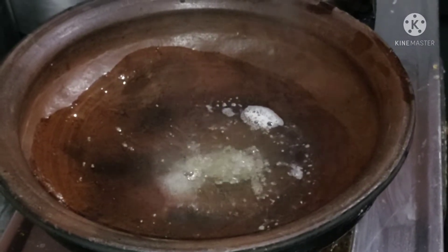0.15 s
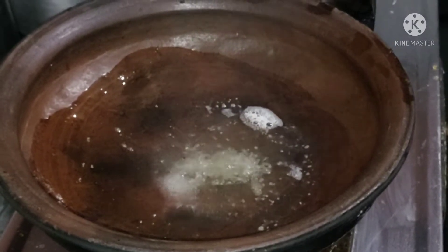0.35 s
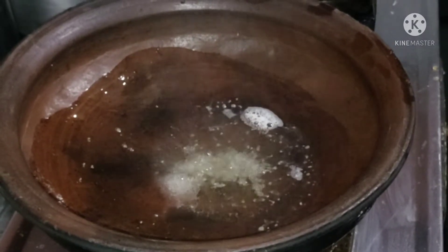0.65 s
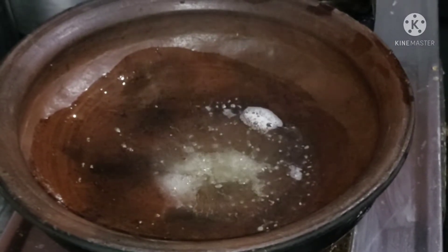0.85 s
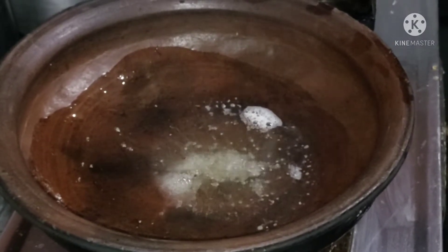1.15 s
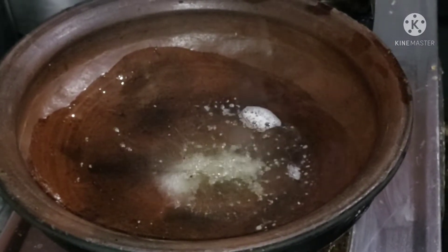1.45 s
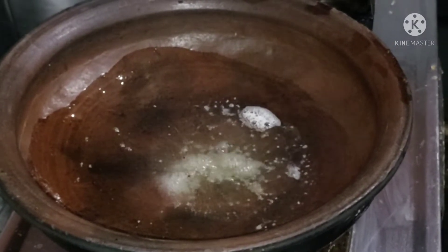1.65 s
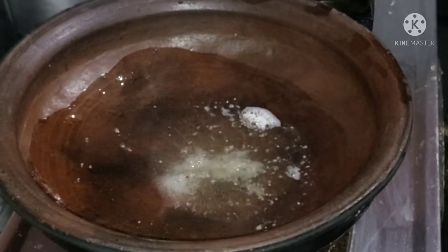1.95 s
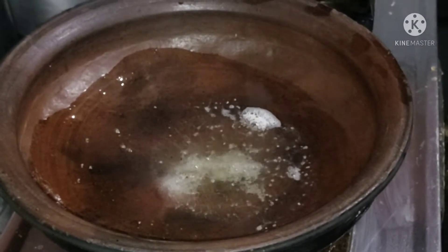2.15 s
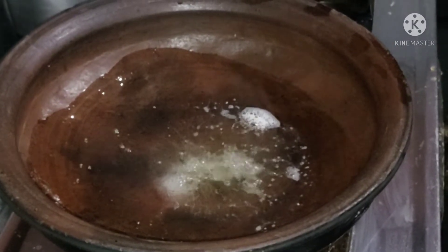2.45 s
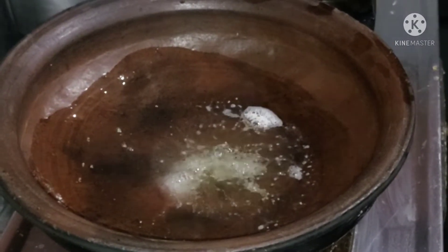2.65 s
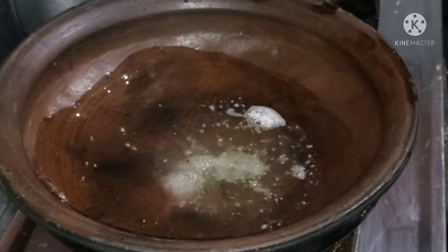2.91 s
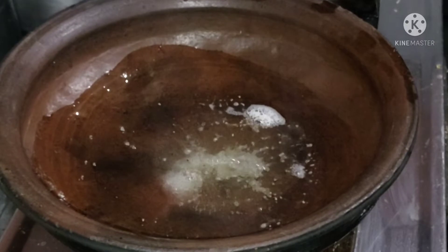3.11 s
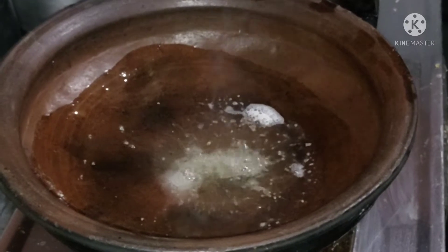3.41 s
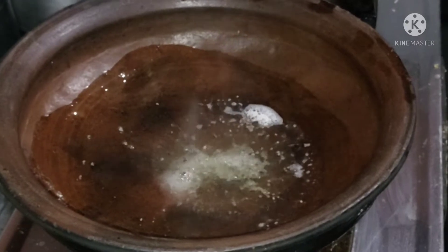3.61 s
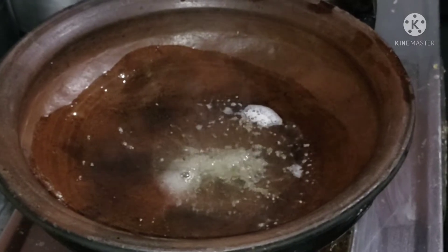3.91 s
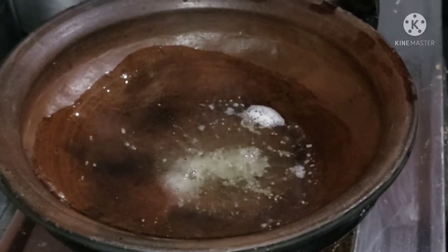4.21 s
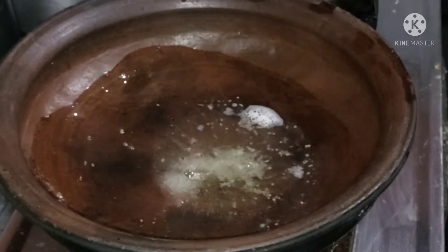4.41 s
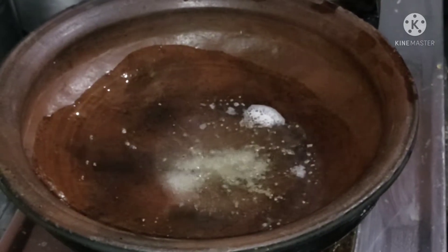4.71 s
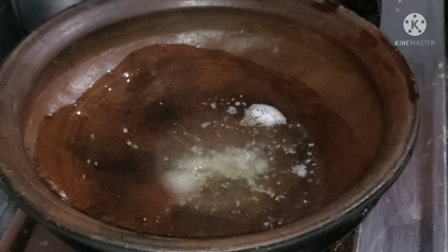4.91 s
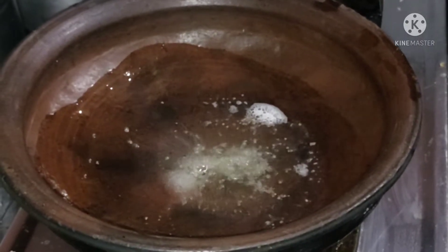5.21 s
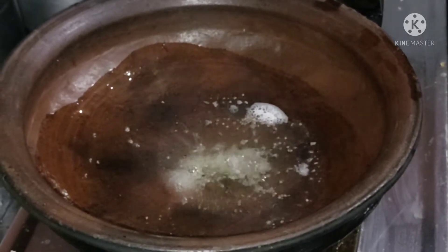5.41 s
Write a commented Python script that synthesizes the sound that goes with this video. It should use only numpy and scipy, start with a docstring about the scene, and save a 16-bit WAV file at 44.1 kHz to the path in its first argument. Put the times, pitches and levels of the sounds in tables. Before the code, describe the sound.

Sharp, hollow pops of bursting seeds in hot oil, bunching into quick flurries, ring briefly in a small hard-walled kitchen.

```python
"""A small, hard-walled kitchen: seeds burst in hot oil in a clay pot on a gas stove, heard close up.
Each burst frees one or two resonant steam bubbles, each with a noisy crack, coloured by the pot and room.
The harder the crack, the brighter it is; twice the oil spits with a sharp hiss, and a few bursts knock the pot.
Underneath lie random sizzle ticks, the burner's filtered-noise rush, a wavering sine hum and soft, far tones."""
import sys
import numpy as np
from scipy import signal
from scipy.fft import rfft, irfft, next_fast_len
from scipy.io import wavfile
from scipy.ndimage import uniform_filter1d, map_coordinates

SR = 44100
rng = np.random.default_rng(int(sys.argv[2]) if len(sys.argv) > 2 else 0)


def wav_out(sig):
    """Save sig, one row per channel (or a flat mono array), as 16-bit PCM at SR to the path in sys.argv[1]."""
    wavfile.write(sys.argv[1], SR, np.round(np.clip(np.atleast_2d(sig).T, -1, 1) * 32767).astype(np.int16))


N = 245195

# soft far tones: (start [s], length [s], pitch [Hz], level [dB])
FAR_TONES = [(-.1, 0.11, 775, -56.5), (-.06, 0.34, 724, -67.5), (-.04, 0.33, 940, -62),
             (.68, 0.21, 353.8, -77), (2.63, 0.079, 390.5, -59.5), (2.68, 0.13, 506, -75)]
# steam bubbles of bursting seeds, before the trim in pops; one burst may free two, a few ms apart:
# (time [s], bubble level [dB], bubble pitch [Hz], crack level at 4 kHz [dB])
SEED_BUBBLES = [(-.03, -4.5, 1620, -39), (.039, -0.5, 1620, -30.5), (0.1639, 10.5, 1513, -23),
                (.242, 3.5, 2100, -14), (.433, 3, 1830, -19.5), (.436, -4.5, 2870, -42),
                (.557, -0.5, 1640, -46), (.7754, -18, 1590, -50), (.842, -6, 1620, -27),
                (1.076, 2, 2240, -17), (1.158, 3.5, 1690, -27), (1.239, -2, 1740, -32),
                (1.298, -4.5, 1570, -35), (1.369, -4.5, 2120, -23), (1.42, 5.5, 1810, -16.5),
                (1.457, 4.5, 1700, -20), (1.628, 5.5, 1720, -19.5), (1.718, 1.5, 1530, -30),
                (1.8247, 3.5, 2525, -21.5), (2.091, -0.5, 1880, -20.5), (2.296, -9, 2050, -23),
                (2.409, -14, 1800, -38), (2.4643, -2.5, 1650, -11.5), (2.5208, 4.5, 2750, -21),
                (2.5499, 10.5, 1680, -23), (2.609, -14.5, 4350, -27), (2.67, 6, 2000, -17),
                (2.783, -9, 1550, -23), (3.0262, -2.5, 1630, -25), (3.2743, 10.5, 1630, -10.5),
                (3.3274, 8.5, 1900, -7.5), (3.369, 10, 1840, -13), (3.44, 8.5, 2310, -15.5),
                (3.4553, 3.5, 2210, -9.5), (3.455, 2.5, 3770, -32), (3.783, -11.5, 3200, -24.5),
                (3.8115, 9, 1520, -18.5), (3.8125, 5, 2560, -18), (4.206, -0.5, 1830, -23),
                (4.512, -0.5, 1840, -19), (4.6183, 3, 1910, -15.5), (4.6202, -7.5, 4270, -49),
                (4.756, -11, 1740, -19.5), (4.859, 0.7, 1660, -25), (4.944, -2.5, 1660, -27),
                (5.036, -0.5, 1800, -29), (5.037, -10.5, 4340, -40), (5.093, -5.5, 6050, -14.5),
                (5.098, 2.5, 1520, -43), (5.1202, 13.5, 1615, -17.5), (5.3204, 6.5, 2600, -18),
                (5.423, 12, 1720, -22), (5.475, 9.5, 1850, -18.5), (5.486, 2.5, 1960, -36)]
# water flashing to steam in the oil, same trim: (time [s], bubble level [dB], bubble pitch [Hz], hiss at 4 kHz [dB])
OIL_SPITS = [(1.212, -17, 1650, -37.5), (1.526, -8.5, 1540, -14)]
# sharpness of a bubble's resonance by its pitch: (pitch [Hz], Q [-])
BUBBLE_SHARPNESS = [(1500, 1.945), (2100, 1.207), (2600, 3.1), (4700, 2.3)]
# colour of the clay bowl: (frequency [Hz], gain [dB])
POT_COLOUR = [(150, -6.5), (400, -6), (750, -13), (1080, -3.5), (1300, 0), (1430, -6), (1590, 2.5),
              (1850, -7.7), (2130, -1), (2420, -12), (2700, 1), (4400, 6), (7000, -4), (15000, -21)]
# delay of each frequency within a burst: (frequency [Hz], delay [s])
BURST_DELAY = [(300, 0.0013), (1500, 0.00186), (3000, 0.00068), (5000, 0.00093), (9000, 0.0001)]
# narrow resonances of pot and stove that stand out in the echoes: (frequency [Hz], gain [dB])
ECHO_RESONANCES = [(947, 4.1), (979, 5.9), (1071, 7.0), (1173, 5.9), (1232, 4.7), (1286, 6.3), (1324, 6.6),
                   (1480, 4.0), (1588, 5.0), (1625, 5.2), (1781, 3.7), (1884, 4.0), (1959, 4.3),
                   (2077, 4.1), (2121, 5.2), (2158, 5.5), (2390, 3.9), (2605, 4.8), (2686, 6.0),
                   (2896, 4.0), (2939, 3.7), (3063, 4.0), (3186, 4.3), (3219, 5.1)]
# first wall reflections: (delay [s], level [dB])
WALL_REFLECTIONS = [(.0105, -4.5), (0.0122, -23.5), (0.0173, -54)]
# time the kitchen's echoes take to fall 60 dB: (frequency [Hz], decay time [s])
KITCHEN_DECAY = [(200, 0.88), (600, 0.59), (1500, 0.43), (3700, 0.34), (9500, 0.28), (15000, 0.34)]
# relative spectrum of the burner's rush: (frequency [Hz], density [dB per Hz])
BURNER_COLOUR = [(15, -32), (25, -0.5), (101, 1), (164, -4), (399, -12), (703, -17.5), (1450, -6),
                 (1570, -11.5), (2420, -13.5), (5280, -16), (6920, -15.5), (15500, -22.5)]
# the hum's level before its trim and wavering: (time [s], level [dB])
HUM_CONTOUR = [(0.0, -85), (0.15, -88), (0.26, -65.5), (0.4, -76.5), (1.98, -79), (2.2, -72), (2.26, -86),
               (4.91, -75.5), (5.39, -93), (5.56, -78)]
# dull knocks of the pot under a few bursts: (time [s], level [dB])
POT_KNOCKS = [(1.158, -18.5), (1.526, -18.5), (3.812, -17)]
# treble and bass balance of the two ports: (frequency [Hz], left minus right [dB])
PORT_BALANCE = [(100, 1.5), (400, 0.5), (1300, 0), (2400, -2.5), (4400, -4), (6500, -5.5), (8500, 6),
                (15000, 11)]

HZ = np.fft.rfftfreq(4096, 1 / SR)  # frequency grid for short impulses
TOP_HZ = 15550  # band limit
TOCK_HZ, TOCK_Q, TOCK_DB = 1590, 8, 8  # air resonance of the bowl
BUBBLE_REACH = 2.85  # a bubble starts softly: little sound above this multiple of its pitch
TYPICAL_CRACK_DB, CRACK_TILT_DB = -22, -0.46  # a typical crack and its slope [dB per octave]
BRIGHTEN = 0.18  # slope gained [dB per octave] for each dB of a harder crack
SPIT_TILT_DB = 14.5  # slope of a spit's hiss [dB per octave]
BURNER_MID_DB = -71.5  # rms of what both sides of the rush share
HUM_HZ, HUM_TRIM_DB, HUM_SWING_DB, HUM_KNOTS_PER_S = 93.3, -0.5, 3, 7
KNOCK_HZ, KNOCK_Q = 464, 0.87


def amp(db):
    """Decibels to gain."""
    return 10 ** (np.asarray(db) / 20)


def unit(x):
    """Scale a signal to rms 1."""
    return x / np.sqrt(np.mean(x ** 2) + 1e-20)


def along(points, hz):
    """Read a (frequency [Hz], value) curve on a log frequency axis."""
    f, v = np.transpose(points)
    return np.interp(np.log(hz + 1), np.log(f + 1), v)


def wobble(rate):
    """A smooth random curve with this many knots a second."""
    knots = rng.standard_normal(int(N * rate / SR) + 4)
    return map_coordinates(knots, [np.arange(N) * rate / SR])


def filtered(x, response):
    """Shape a sound with a gain that depends on frequency."""
    n = x.shape[-1]
    m = next_fast_len(n + 8192)
    spectrum = rfft(x, m) * response(np.fft.rfftfreq(m, 1 / SR))
    return irfft(spectrum, m)[..., :n]


def impulse(gain):
    """The minimum-phase impulse with these gains on the HZ grid: energy comes as early as it can."""
    cepstrum = irfft(np.log(np.maximum(gain, 1e-6)))
    half = len(cepstrum) // 2
    cepstrum[1:half] *= 2
    cepstrum[half + 1:] = 0
    return irfft(np.exp(rfft(cepstrum)))


def bell(hz, q):
    """A resonance peak of height 1 on the HZ grid."""
    return 1 / (1 + q ** 2 * ((HZ + 1) / hz - hz / (HZ + 1)) ** 2)


def add(track, s, sound):
    """Mix a sound into a track at time s."""
    start = round(s * SR)
    part = sound[..., max(-start, 0):max(N - start, 0)]
    track[..., max(start, 0):max(start, 0) + part.shape[-1]] += part


def echo_noise(alike, grain_db=2):
    """Dense, lumpy stereo echoes: more alike in the bass, with peaks at the pot and stove resonances."""
    noise = rng.standard_normal((2, SR * 3 // 5))
    lumps = unit(uniform_filter1d(rng.standard_normal(noise.shape[1]), size=90))
    noise = unit(noise * amp(grain_db * lumps))

    def colour(hz):
        width_hz = 10
        peaks = sum((amp(db) - 1) * np.exp(-((hz - f) / width_hz) ** 2) for f, db in ECHO_RESONANCES)
        tint_db = along([(800, 8.5), (1000, 8), (1600, 7.0), (2120, 9.0), (2450, 14),
                         (2690, 6), (3000, 1), (3500, 0)], hz)
        likeness = along([(300, 0.8), (900, alike), (3000, 0)], hz)
        turn = np.arccos(np.clip(likeness, 0, 1)) / 2  # shares power between mid and side
        return amp(tint_db) * (1 + peaks) * np.array([np.cos(turn), np.sin(turn)])

    mid, side = filtered(noise, colour)
    return np.array([mid + side, mid - side])


def room(echoes, direct):
    """Path to the two ports: direct sound, first walls, then echoes that mostly die faster in the treble."""
    hz, t, z = signal.stft(echoes, SR, nperseg=256)
    t60 = along(KITCHEN_DECAY, hz)[:, None]
    even_energy = np.sqrt(2 * np.log(1000) / (t60 * SR))  # a long decay starts lower
    decay = amp(-60 * t / t60) * even_energy
    path = signal.istft(z * decay, SR, nperseg=256)[1]
    build_s = .004  # echoes take a few ms to gather
    path *= 1 - np.exp(-(np.arange(path.shape[1]) / SR / build_s) ** 2)
    lag = rng.integers(2, 6)  # the right port lies a few samples farther away
    path[0, :len(direct)] += direct
    path[1, lag:lag + len(direct)] += direct
    dull = np.array([.25, .5, .25])  # a wall sends back less treble than it receives
    for delay, db in WALL_REFLECTIONS:
        at = np.round((delay + rng.uniform(0, .0005, (2, 1))) * SR).astype(int)
        path[[[0], [1]], at + np.arange(len(dull))] += amp(db) * dull
    return path


def far_tones():
    """Brief sines whose pitch wavers slightly, blurred by the room."""
    out = np.zeros((2, N))
    waver = .017  # share of the pitch
    for s, length, hz, db in FAR_TONES:
        n = round(length * SR)
        pitch = hz * (1 + waver * wobble(23.4)[:n])
        tone = np.sin(2 * np.pi * np.cumsum(pitch) / SR) * signal.windows.tukey(n, .5)
        heard = signal.fftconvolve(tone[None], room(echo_noise(alike=0.51), amp([-4])), axes=1)
        loudness = np.sqrt(np.sum(heard ** 2) / (2 * n))
        add(out, s, amp(db) * heard / loudness)
    return out


def crack_tilt(crack_db):
    """The harder a husk cracks, the brighter it sounds [dB per octave]."""
    return CRACK_TILT_DB + BRIGHTEN * (crack_db - TYPICAL_CRACK_DB)


def late(delay):
    """Phase that lets each frequency leave at its own moment [s]."""
    return np.exp(-2j * np.pi * np.cumsum(delay) * HZ[1])


def bubble_and_crack(bubble_db, bubble_hz, q, crack_db, tilt):
    """One steam bubble rings briefly, with a crack smeared over a millisecond or two; the bowl colours both."""
    soft_start = 1 + (HZ / (BUBBLE_REACH * bubble_hz)) ** 4
    bubble = rfft(impulse(amp(bubble_db) * bell(bubble_hz, q) / soft_start))
    octaves = np.log2(np.clip(HZ, 350, TOP_HZ) / 4000)
    crack = rfft(impulse(amp(crack_db + tilt * octaves)))
    # random delays smear the crack
    tear = .0012 * np.abs(unit(uniform_filter1d(rng.standard_normal(len(HZ)), size=120)))
    radiation = HZ ** 2 / (HZ ** 2 + 160 ** 2)  # so small a source gives no deep bass
    bowl = rfft(impulse(radiation * amp(along(POT_COLOUR, HZ))))
    return irfft((bubble + crack * late(tear)) * bowl * late(along(BURST_DELAY, HZ)))


def pops(level_db=-1):
    """Bubbles of bursting seeds and spits: only part of the echo pattern repeats from one to the next."""
    out, common = np.zeros((2, N)), echo_noise(alike=0.25)
    direct_db, own = -2.3, .6  # own: share of echo power that is new to each bubble
    # the bowl beams its air resonance upward: a tock
    direct = impulse(amp(direct_db + TOCK_DB * bell(TOCK_HZ, TOCK_Q)))
    bubbles = [(*row, crack_tilt(row[-1])) for row in SEED_BUBBLES]
    bubbles += [(*row, SPIT_TILT_DB) for row in OIL_SPITS]
    for s, bubble_db, hz, crack_db, tilt in bubbles:
        echoes = np.sqrt(1 - own) * common + np.sqrt(own) * echo_noise(alike=0.1)
        sound = bubble_and_crack(bubble_db, hz, along(BUBBLE_SHARPNESS, hz), crack_db, tilt)
        add(out, s, signal.fftconvolve(sound[None], room(echoes, direct), axes=1))
    return amp(level_db) * out


def burner():
    """The gas rush: wide stereo noise with a fixed colour and a slightly wandering level."""
    mid, side = filtered(rng.standard_normal((2, N)), lambda hz: amp(along(BURNER_COLOUR, hz)))
    side = filtered(side, lambda hz: amp(along([(250, -1.8), (1200, -2), (4000, -0.5)], hz)))
    flicker_db = .7 * wobble(5)
    return np.array([mid + side, mid - side]) / np.std(mid) * amp(BURNER_MID_DB + flicker_db)


def hum():
    """The kitchen's low hum: one sine, unsteady in pitch and level, the same on both sides."""
    phase = 2 * np.pi * np.cumsum(HUM_HZ + 3.5 * wobble(20)) / SR
    contour_db = np.interp(np.arange(N) / SR, *np.transpose(HUM_CONTOUR))
    level_db = HUM_TRIM_DB + contour_db + HUM_SWING_DB * wobble(HUM_KNOTS_PER_S)
    return amp(level_db) * unit(np.sin(phase))


def sizzle(ticks_per_s=160, level_db=-79):
    """Tiny bubbles tick at random in the foam around the seeds."""
    chance, size = rng.random(N), np.minimum(rng.exponential(size=N), 4)
    spread_db = 2.5  # per unit of size
    ticks = (chance < ticks_per_s / SR) * amp(spread_db * size)
    colour = [(200, -29), (650, -6), (1500, -21), (4000, -39), (15000, 43)]
    ticks = filtered(ticks, lambda hz: amp(along(colour, hz)))
    path = room(echo_noise(alike=0.064), amp([-6]))
    heard = signal.fftconvolve(ticks[None], path, axes=1)[:, :N]
    return amp(level_db) * unit(heard)


def knocks():
    """A burst right on the clay also gives the pot a short, low push."""
    out = np.zeros((2, N))
    for s, db in POT_KNOCKS:
        push = impulse(amp(db) * bell(KNOCK_HZ, KNOCK_Q))
        add(out, s, signal.fftconvolve(push[None], room(echo_noise(alike=0.43), amp([0])), axes=1))
    return out


def scene():
    """Everything that reaches the two ports."""
    return far_tones() + pops() + burner() + hum() + sizzle() + knocks()


def record(dry):
    """The two ports colour the sound differently; nothing passes the band limit."""
    def ports(hz):
        pair = amp(np.array([[.5], [-.5]]) * along(PORT_BALANCE, hz))
        return pair / np.sqrt(np.mean(pair ** 2, axis=0))  # keeps the summed power
    return filtered(dry, lambda hz: ports(hz) * (hz < TOP_HZ))


dry = scene()
out = record(dry)
wav_out(out)
```